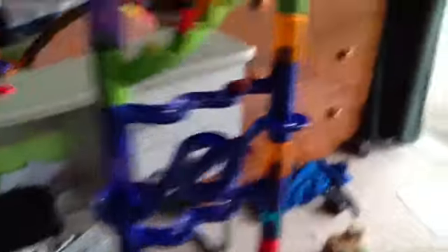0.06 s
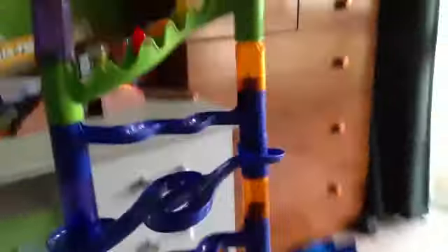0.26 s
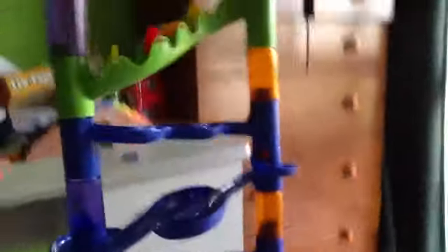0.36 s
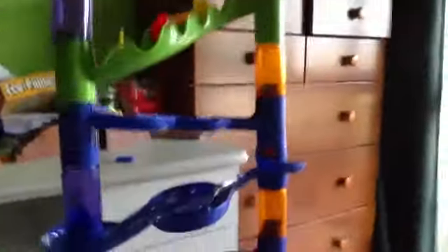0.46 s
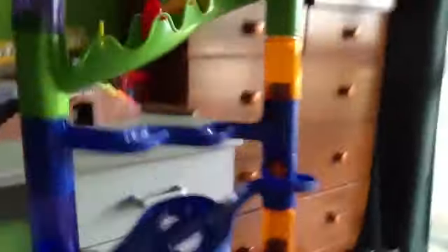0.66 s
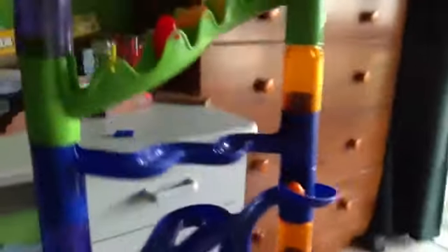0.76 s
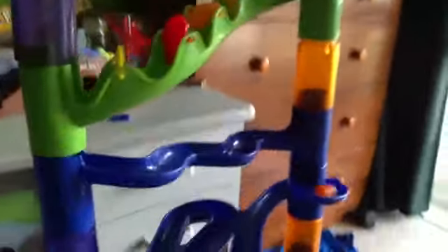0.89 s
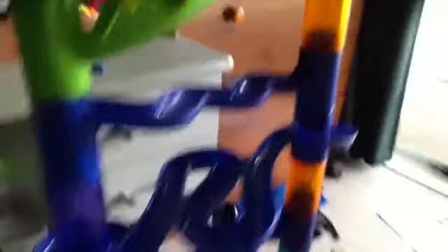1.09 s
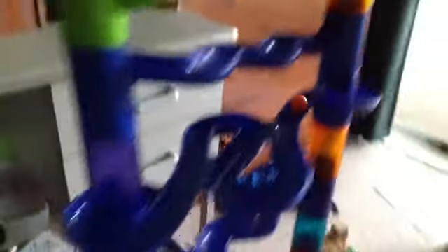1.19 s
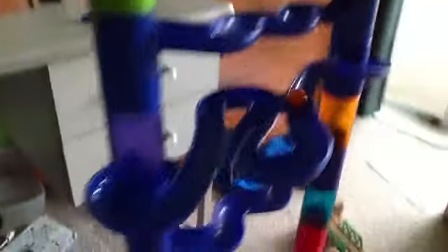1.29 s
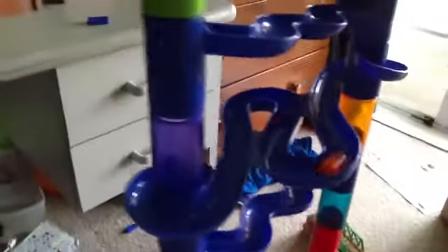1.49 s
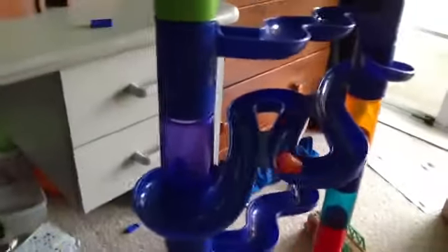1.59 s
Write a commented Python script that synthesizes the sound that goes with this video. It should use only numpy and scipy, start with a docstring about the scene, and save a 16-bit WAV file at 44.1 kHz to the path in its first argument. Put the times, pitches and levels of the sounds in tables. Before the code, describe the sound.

A marble rolls, clacks and bounces quickly along a plastic toy track indoors.

```python
"""A glass marble rolls and knocks lightly along a plastic toy track in a small room. It strikes a tower
wall, drops through and bounces ever faster on the tower's floor, then rolls on against the bends of a
chute. Each impact excites damped modes of the plastic; rolling drives them with many tiny impulses, and
the tower's tube resonates faintly. The hand-held microphone takes a few soft bumps, while the room adds
a short reverberation and a faint hiss."""
import sys
import numpy as np
from scipy import signal
from scipy.fft import rfft, irfft, next_fast_len
from scipy.io import wavfile
from scipy.ndimage import map_coordinates

SR = 44100
rng = np.random.default_rng(int(sys.argv[2]) if len(sys.argv) > 2 else 0)


def bounce(signal):
    """Save signal as a 16-bit WAV file at the path given by the first command-line argument."""
    frames = np.transpose(np.atleast_2d(signal))
    limited = np.clip(frames, -1, 1)
    pcm = np.round(limited * 32767).astype(np.int16)
    wavfile.write(sys.argv[1], SR, pcm)


N = 72765

# Rolling rattle, ring of the chute's lower loop, and sliding hiss: time_s, level_db
ROLL_LEVEL = [(0, -57), (.04, -47.5), (.07, -55.5), (.095, -40.5), (.125, -51.5), (.15, -46.5), (.19, -57),
              (.75, -56.5), (.88, -51), (.95, -47.5), (1.04, -46.5), (1.16, -45.5), (1.24, -43),
              (1.33, -47), (1.42, -72), (1.46, -55), (1.51, -49.5), (1.55, -46), (1.65, -51.5)]
LOOP_LEVEL = [(1.36, -97), (1.43, -57), (1.48, -60.5), (1.53, -54), (1.57, -73), (1.61, -61.5), (1.65, -60)]
SLIDE_LEVEL = [(0, -52.5), (.05, -61.5), (.09, -54.5), (.13, -58.5), (.8, -57), (1.0, -56), (1.15, -56.5),
               (1.29, -49.5), (1.36, -57.5), (1.44, -65.5), (1.52, -61), (1.65, -77)]
# Spectra of the rattle and the sliding hiss: frequency_hz, gain_db
ROLL_COLOUR = [(150, -27.5), (600, -13.5), (900, -17), (1050, -11), (1400, -15), (1850, -4), (2250, 6),
               (2600, 1.5), (3200, -12.5), (4700, -36), (7000, -56), (15000, -65)]
SLIDE_COLOUR = [(500, -3), (2500, -6.5), (4600, 8.5), (6500, 2.5), (8300, 3), (10500, 0.5), (15000, -14)]
# Resonances of the lower loop: pitch_hz, q_per_stage, gain_db
LOOP_MODES = [(1100, 4.2, 5), (3530, 12, -4)]
ROLL_DB, TICKS_PER_S, TICK_SPREAD_DB = -0.5, 1200, 5

# Rustle of the hand on the microphone: time_s, level_db
GRIP_LEVEL = [(0, -80), (.035, -50.5), (.055, -64), (.09, -50.5), (.14, -80), (.2, -53), (.24, -53.5),
              (.29, -79), (.4, -94)]
# Soft bumps on the microphone's case: start_s, level_db
BUMPS = [(0.1726, -29), (0.4877, -43.5), (0.59, -51), (1.2690, -44.5)]
BUMP_END_HZ, BUMP_DROP_HZ, BUMP_GLIDE_S, BUMP_RISE_S, BUMP_T60_S = 105, 205, 0.0056, 0.00065, 0.048
# Dry clicks of the case: start_s, level_db, t60_s
CASE_CLICKS = [(0.1736, -21.5, 0.0077), (.1862, -39, 0.0018)]
# Spectra of the rustle and the clicks: frequency_hz, gain_db
GRIP_COLOUR = [(30, -17), (90, -11), (180, 1.5), (300, -5.5), (600, -7.5), (1500, -14), (5000, -83)]
CASE_COLOUR = [(200, 7), (600, -6), (1000, -7), (2500, -1), (3400, -15), (4100, 4.5), (5200, -3),
               (6200, -3), (6900, 3), (7800, -11), (12500, -9), (15500, -12)]

# Light knocks on the track walls: start_s, level_db, cutoff_hz, pitch_hz, tone_gain_db
KNOCKS = [(0.0464, -46.5, 3530, 2336, 18), (0.0906, -39, 9250, 1970, -8), (.0995, -47.5, 3930, 2190, 25),
          (0.149, -41, 3500, 2310, 13.5), (0.2234, -29, 5030, 2400, 12), (0.276, -30.5, 8500, 2580, 11),
          (.2940, -24, 10900, 2370, 7.5), (.3190, -34, 6000, 2500, 9), (0.3771, -25.5, 5300, 2510, 3),
          (0.4219, -22.5, 6800, 2480, 2.5), (0.462, -26.5, 6000, 2680, 5), (0.7940, -41, 5000, 2550, 11),
          (0.866, -38, 6160, 2220, 8), (.9280, -43.5, 3380, 1930, 14.5), (0.9897, -37, 4330, 2234, 15),
          (1.0054, -40, 3450, 2220, 13), (1.0671, -31, 5330, 2770, 2), (1.092, -32, 4030, 2220, 12),
          (1.1170, -27.5, 4050, 2350, 11), (1.1513, -35, 7460, 2250, 5), (1.235, -39, 4530, 2400, 4),
          (1.3104, -34, 6000, 2450, -5), (1.3646, -28.5, 4270, 2660, 4.5), (1.429, -34.5, 7100, 1710, 1.5),
          (1.4695, -38.5, 3940, 2395, 13), (1.4898, -49, 4000, 2334, 18), (1.496, -45, 4050, 2385, 18.5),
          (1.5028, -45, 4040, 2404, 17.5), (1.5279, -34.5, 4100, 2380, 3)]
WALL_T60_S, WALL_RISE_S = 0.017, 0.001
# Spectra of the thin plastic's clack, in the open chute and in the tower: frequency_hz, gain_db
CHUTE_CLACK = [(100, -27), (700, -25), (1100, -15), (1500, -14.5), (1950, -0.5), (2600, 0.5), (3300, -3.5),
               (4700, -5), (5600, -5.5), (8400, -4.5), (9500, -8), (13000, -10.5), (15500, -16)]
TOWER_CLACK = [(100, -36), (550, -29.5), (1500, -23), (2400, 6), (2950, 3.5), (3400, -10), (4400, -3),
               (5600, -5.5), (8000, -0.5), (9600, -6), (13000, -5), (15500, -2.5)]
CLACK_T60_S, SNAP_T60_S, RADIATION_CUT_HZ = 0.024, 0.0038, 244
CHUTE_SNAP_DB, CHUTE_RISE_S = -2.5, 0.00045

# Modes of the parts that are struck hard: pitch_hz, level_db, t60_s
TOWER_WALL = [(2185, 9, 0.022), (2880, 2.5, 0.017), (3520, -7.5, 0.024), (3850, -4, .018),
              (4240, -0.5, 0.018), (6040, -4, 0.012), (7250, 4, 0.01), (8190, -0.5, .012)]
OUTLET = [(1680, -39, 0.02), (2136, -0.5, 0.053), (2504, -1.5, 0.027), (2640, 1.5, 0.025), (3370, -7, 0.03),
          (3900, -3, 0.018), (4500, 0.5, .022), (5040, -4, 0.0083), (8460, 3.5, 0.019)]
FIRST_BEND = [(1125, -16.5, .045), (1706, -6, 0.028), (2050, -2.5, 0.024), (2415, 5.5, 0.026),
              (2850, -18, 0.0089), (5140, 0, 0.013), (5950, -5, 0.01), (6830, 1, 0.01)]
SECOND_BEND = [(2120, -7.5, 0.018), (2370, 14, 0.014), (2900, 0, 0.016), (3510, -1.5, 0.019),
               (4800, -11, .016), (6020, -3, 0.016), (7060, -0.5, 0.017), (7700, -8, 0.012)]
# Hard hits on those parts: start_s, level_db, cutoff_hz, clack_gain_db, part_modes
HITS = [(0.2145, -17, 10400, -2.5, TOWER_WALL), (0.753, -21.5, 7800, 1, OUTLET),
        (1.1062, -23.5, 10500, -0.5, FIRST_BEND), (1.3778, -25, 8600, -0.5, SECOND_BEND)]

# Landings on the tower's floor: start_s, level_db, cutoff_hz, low_ring_gain_db, bright_edge_gain_db
BOUNCES = [(0.2461, -11.5, 13200, -7, 2.5), (.3470, -14.5, 13400, -0.5, -0.5),
           (0.4264, -16.5, 12400, -6.5, -0.5), (.4887, -16.5, 12000, -0.5, -10),
           (0.541, -19, 7440, -3, -21), (.5820, -19.5, 11900, -1.5, -4), (0.6128, -21.5, 11200, -3.5, -11),
           (0.6397, -24.5, 11100, -2, -3), (0.6610, -26.5, 7700, 2.5, -12), (0.6793, -29, 6660, 4.5, -3),
           (0.6942, -29, 6000, 0, 2.5), (0.7048, -31.5, 5100, 5, 0), (0.7125, -34, 4950, 1, 2)]
LOW_RING_HZ, LOW_RING_Q, EDGE_HZ, EDGE_Q = 2250, 10.5, 7120, 3.9
# Modes of the tower: pitch_hz, level_db
TOWER_MODES = [(560, -29), (800, -32.5), (1060, -19.5), (1350, -28), (2210, -0.5), (2450, -7), (2930, 0.5),
               (3420, -7.5), (3760, -4.5), (4080, -5), (4660, -2), (6200, 0.5), (7650, 2.5), (8400, -10),
               (10400, 2.5), (12950, 13)]
TOWER_RING_DB, TOWER_CLACK_DB, TOWER_T60_CYCLES, TOWER_MAX_T60_S = -0.5, -6, 60.4, 0.025
MODE_SCATTER_DB, DETUNE_FRACTION, DETUNE_ABOVE_HZ = 1, .012, 3200

# Hollow tones of the tower's tube: pitch_hz, level_db
TUBE_TONES = [(291, 0), (398, -2), (588, 2.5)]
# Their common envelope: time_s, level_db
TUBE_LEVEL = [(.25, -88), (.4, -98), (.6, -67.5), (.8, -65), (.92, -68), (1.05, -76), (1.3, -106)]
TUBE_WAVER_HZ, TUBE_WAVER_DB = 3.95, -2.5

# Spectra of the room's hiss and reverberation: frequency_hz, gain_db
AIR_COLOUR = [(25, -29), (70, -21), (120, -15.5), (180, -9), (230, -10), (300, -15.5), (400, -2),
              (500, -10), (750, -4.5), (1050, 1), (1500, -2.5), (3000, -3.5), (8000, -11), (13000, -15.5),
              (15500, -23)]
ROOM_COLOUR = [(100, -3.5), (1000, 10), (2400, -5.5), (5000, 3), (9000, -10.5), (15000, -0.5)]
# Reverberation time: frequency_hz, t60_s
ROOM_T60 = [(200, 0.14), (1000, 0.1), (2300, 0.25), (5000, 0.2), (9000, 0.33), (15000, 0.14)]
AIR_DB, ROOM_DB, ROOM_RISE_S, ECHO_S, ECHO_DB = -56, -6, 0.0028, 0.0043, -15
SPREAD_RING_DB, SPREAD_CLACK_DB, SPREAD_RING_TOP_HZ = -2, 2.5, 4900  # what a blow sends into the room
MIC_LOW_HZ, TOP_HZ = 83.6, 15500


def amp(db):
    """Amplitude grows tenfold every 20 dB."""
    return 10 ** (np.asarray(db) / 20)


def unit(x):
    """Normalisation to rms 1."""
    return x / np.sqrt(np.mean(x ** 2) + 1e-20)


def along(points, hz):
    """Interpolation on a logarithmic frequency axis."""
    frequencies, values = np.transpose(points)
    return np.interp(np.log(hz + 1), np.log(frequencies + 1), values)


def level(points):
    """An amplitude envelope, interpolated in decibels."""
    return amp(np.interp(np.arange(N) / SR, *np.transpose(points)))


def filtered(x, response):
    """Linear filtering multiplies the spectrum by a frequency response."""
    size = next_fast_len(len(x) + 8192)
    return irfft(rfft(x, size) * response(np.fft.rfftfreq(size, 1 / SR)), size)[:len(x)]


def rolloff(x, kind, hz):
    """A second-order filter sheds about 12 dB an octave beyond its cutoff."""
    return signal.sosfilt(signal.butter(2, hz, kind, fs=SR, output="sos"), x)


def resonance(x, hz, q):
    """A resonator passes a band of width hz / q."""
    return signal.lfilter(*signal.iirpeak(hz, q, fs=SR), x)


def noise(colour, size):
    """Spectral shaping turns white noise into coloured noise of rms 1."""
    return unit(filtered(rng.standard_normal(size), lambda hz: amp(along(colour, hz))))


def wobble():
    """Slow random modulation: a spline through twelve knots a second."""
    knots = np.arange(N) * 12 / SR
    return map_coordinates(rng.standard_normal(int(knots[-1]) + 2), [knots], mode="nearest")


def fade(t, t60):
    """Exponential damping, 60 dB in t60."""
    return np.exp(-np.log(1000) * t / t60)


def rise(t, tau_s):
    """Exponential build-up with time constant tau_s."""
    return 1 - np.exp(-t / tau_s)


def add(track, start_s, sound):
    """Superposition of a delayed sound on a track."""
    part = track[max(round(start_s * SR), 0):][:len(sound)]
    part += sound[:len(part)]


def in_room(direct, spread):
    """Direct sound is followed by one early reflection and the diffuse tail of the spread sound."""
    hz, t, spectrum = signal.stft(rng.standard_normal(SR // 2), SR, nperseg=256)
    decay = fade(t, along(ROOM_T60, hz)[:, None])
    colour = amp(along(ROOM_COLOUR, hz))[:, None]
    tail = signal.istft(spectrum * decay * colour, SR, nperseg=256)[1]
    tail *= rise(np.arange(len(tail)) / SR, ROOM_RISE_S)
    out = signal.fftconvolve(spread, amp(ROOM_DB) * tail / np.linalg.norm(tail))
    add(out, 0, direct)
    add(out, ECHO_S, amp(ECHO_DB) * direct)
    return out


def rolling():
    """Random impulses from the uneven plastic drive the chute's resonances, hollower in the loop."""
    ticks = (rng.random(N) < TICKS_PER_S / SR) * rng.choice([-1, 1], N)
    ticks = ticks * amp(TICK_SPREAD_DB * np.clip(rng.standard_normal(N), -2, 2))
    rattle = filtered(ticks, lambda hz: amp(along(ROLL_COLOUR, hz)))
    chute = unit(in_room(rattle, rattle)[:N])
    loop = unit(sum(amp(db) * resonance(resonance(ticks, hz, q), hz, q) for hz, q, db in LOOP_MODES))
    return level(ROLL_LEVEL) * amp(ROLL_DB) * chute + level(LOOP_LEVEL) * loop


def sliding():
    """Friction makes a broadband hiss as the marble slides through the bends."""
    return level(SLIDE_LEVEL) * noise(SLIDE_COLOUR, N)


def room_hiss():
    """The room's noise floor is faint, stationary coloured noise."""
    return amp(AIR_DB) * noise(AIR_COLOUR, N)


def handling():
    """Structure-borne sound bypasses the room: hand rustle, bumps that sink in pitch, and case clicks."""
    out, t = level(GRIP_LEVEL) * noise(GRIP_COLOUR, N), np.arange(SR // 10) / SR
    phase = 2 * np.pi * np.cumsum(BUMP_END_HZ + BUMP_DROP_HZ * np.exp(-t / BUMP_GLIDE_S)) / SR
    bump = -np.sin(phase) * rise(t, BUMP_RISE_S) * fade(t, BUMP_T60_S)
    for start_s, db in BUMPS:
        add(out, start_s, amp(db) * bump)
    for start_s, db, t60 in CASE_CLICKS:
        click = noise(CASE_COLOUR, len(t)) * fade(t, t60)
        add(out, start_s, amp(db) * contact(click, cutoff_hz=.45 * SR))
    return out


def contact(x, cutoff_hz):
    """A softer contact excites less treble, and small parts radiate little bass."""
    return rolloff(rolloff(x, "highpass", RADIATION_CUT_HZ), "lowpass", cutoff_hz)


def clack(t, colour, rise_s, snap_db):
    """Dense, heavily damped modes overlap into noise: a snap, then a short ring."""
    envelope = rise(t, rise_s) * (fade(t, CLACK_T60_S) + amp(snap_db) * fade(t, SNAP_T60_S))
    return unit(noise(colour, len(t)) * envelope) * np.sqrt(np.mean(envelope ** 2))


def knocks():
    """A glancing impact excites a clack and one damped mode of the piece of wall it meets."""
    out, t = np.zeros(N), np.arange(SR // 10) / SR
    for start_s, db, cutoff_hz, hz, tone_db in KNOCKS:
        tone = amp(tone_db) * np.sin(2 * np.pi * hz * t) * rise(t, WALL_RISE_S) * fade(t, WALL_T60_S)
        knock = contact(clack(t, CHUTE_CLACK, CHUTE_RISE_S, CHUTE_SNAP_DB) + tone, cutoff_hz)
        add(out, start_s, amp(db) * in_room(knock, knock))
    return out


def blow(ring, clatter, cutoff_hz):
    """Single modes stand out in the direct field; the diffuse field favours the clatter."""
    spread = amp(SPREAD_RING_DB) * contact(ring, SPREAD_RING_TOP_HZ) + amp(SPREAD_CLACK_DB) * clatter
    return in_room(contact(ring + clatter, cutoff_hz), contact(spread, cutoff_hz))


def hits():
    """A head-on impact clacks and sets a whole part into free vibration at its natural frequencies."""
    out, t = np.zeros(N), np.arange(SR // 10) / SR
    for start_s, db, cutoff_hz, clack_db, part_modes in HITS:
        ring = sum((-1) ** k * amp(mode_db) * fade(t, t60) * np.sin(2 * np.pi * hz * t)
                   for k, (hz, mode_db, t60) in enumerate(part_modes))
        ring *= rise(t, tau_s=0.00086)
        clatter = amp(clack_db) * clack(t, CHUTE_CLACK, CHUTE_RISE_S, CHUTE_SNAP_DB)
        add(out, start_s, amp(db) * blow(ring, clatter, cutoff_hz))
    return out


def tower_ring(t):
    """The point of impact shifts the balance of the tower's modes and the pitch of the high ones."""
    ring = np.zeros(len(t))
    for k, (hz, db) in enumerate(TOWER_MODES):
        hz *= 1 + DETUNE_FRACTION * rng.normal() * (hz > DETUNE_ABOVE_HZ)
        decay = fade(t, min(TOWER_T60_CYCLES / hz, TOWER_MAX_T60_S))
        gain = (-1) ** k * amp(db + MODE_SCATTER_DB * rng.normal())
        ring += gain * decay * np.sin(2 * np.pi * hz * t)
    return amp(TOWER_RING_DB) * ring * rise(t, tau_s=0.001)


def bounces():
    """Inelastic collisions with the floor ring the tower ever sooner and more weakly."""
    out, t = np.zeros(N), np.arange(SR // 10) / SR
    for start_s, db, cutoff_hz, low_ring_db, edge_db in BOUNCES:
        ring = tower_ring(t)
        clatter = amp(TOWER_CLACK_DB) * clack(t, TOWER_CLACK, rise_s=0.00017, snap_db=10.5)
        landing = blow(ring, clatter, cutoff_hz)
        # Each landing has its own boost or cut in two bands.
        low_ring = (amp(low_ring_db) - 1) * resonance(landing, LOW_RING_HZ, LOW_RING_Q)
        bright_edge = (amp(edge_db) - 1) * resonance(landing, EDGE_HZ, EDGE_Q)
        add(out, start_s, amp(db) * (landing + low_ring + bright_edge))
    return out


def tube():
    """Resonances of the tower's tube linger as faint, wavering hollow tones."""
    tones = np.zeros(N)
    for hz, db in TUBE_TONES:
        gain = amp(db + TUBE_WAVER_DB * wobble())
        phase = 2 * np.pi * np.cumsum(hz + TUBE_WAVER_HZ * wobble()) / SR
        tones += gain * np.sin(phase)
    return level(TUBE_LEVEL) * unit(tones)


def scene():
    """The pressures of marble, room and hand superpose in one channel."""
    return (rolling() + sliding() + room_hiss() + handling() + knocks() + hits() + bounces() + tube())[None]


def record(dry):
    """Band limiting: the microphone sheds deep bass, and nothing above TOP_HZ is kept."""
    thin = rolloff(dry[0], "highpass", MIC_LOW_HZ)
    return filtered(thin, lambda hz: hz < TOP_HZ)[None]


dry = scene()
out = record(dry)
bounce(out)
```